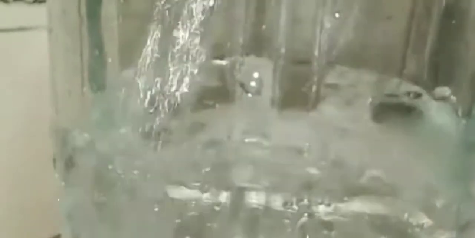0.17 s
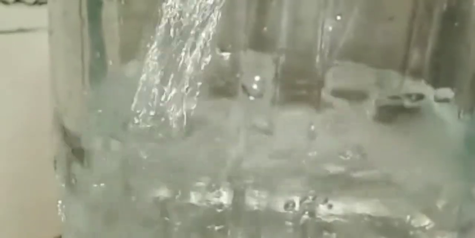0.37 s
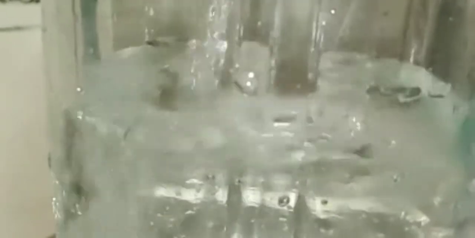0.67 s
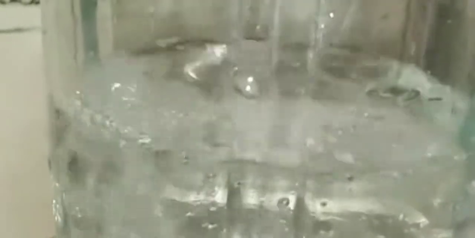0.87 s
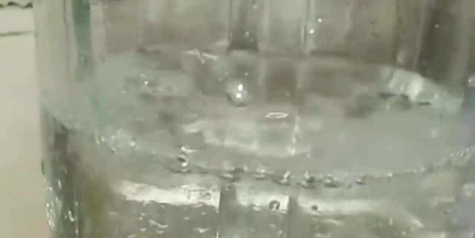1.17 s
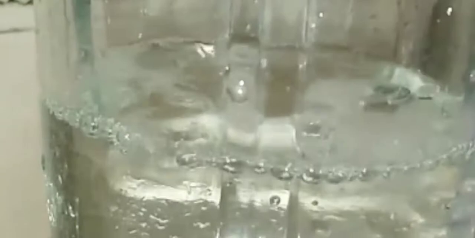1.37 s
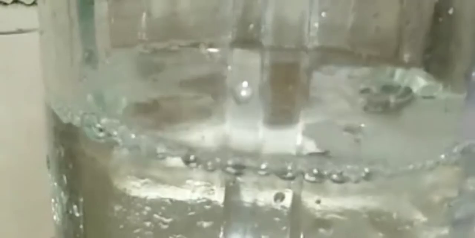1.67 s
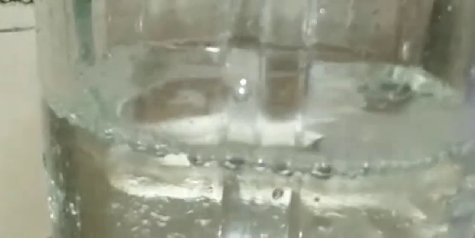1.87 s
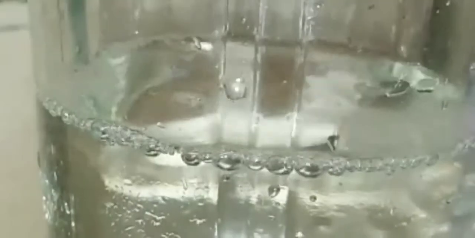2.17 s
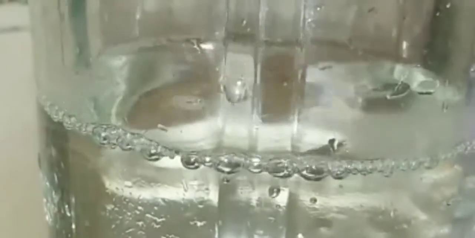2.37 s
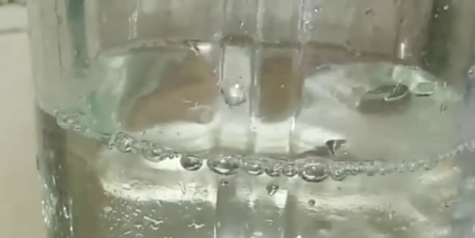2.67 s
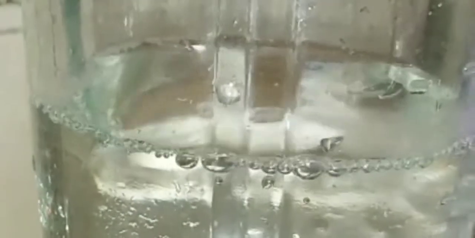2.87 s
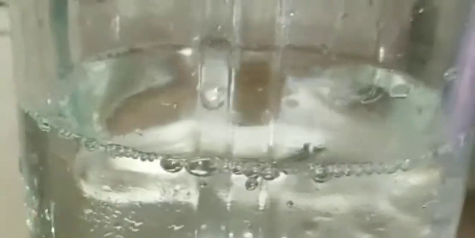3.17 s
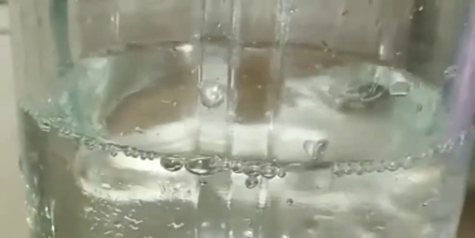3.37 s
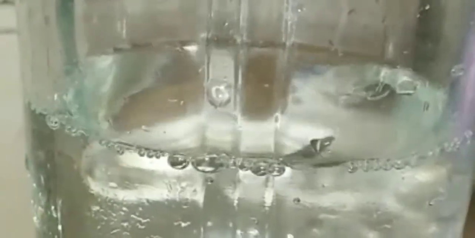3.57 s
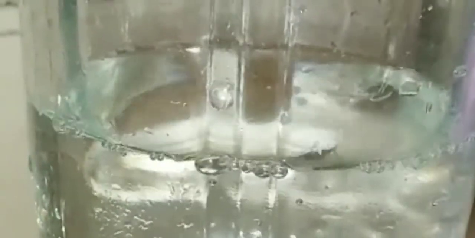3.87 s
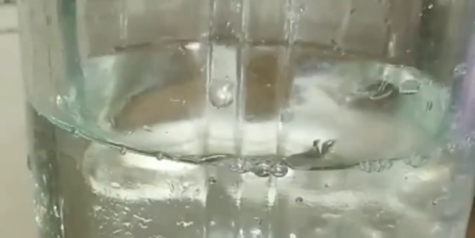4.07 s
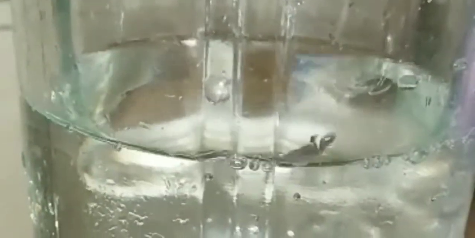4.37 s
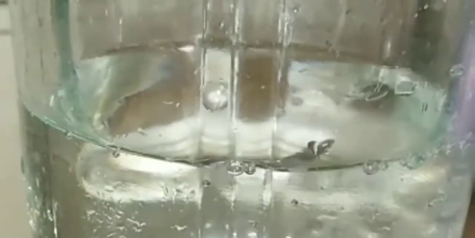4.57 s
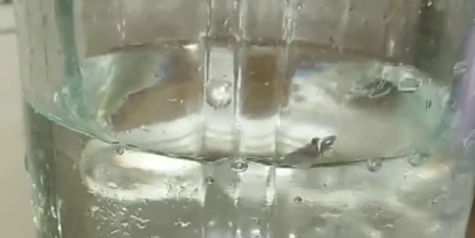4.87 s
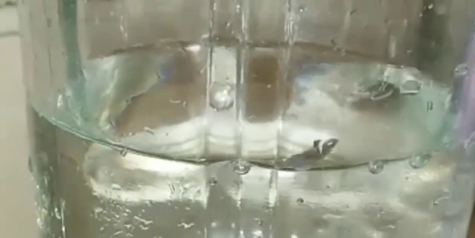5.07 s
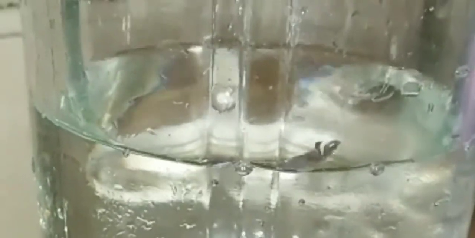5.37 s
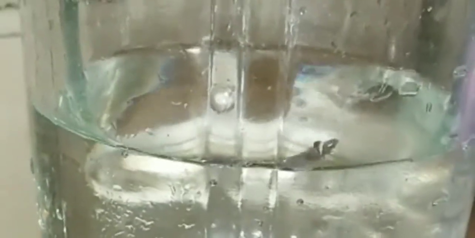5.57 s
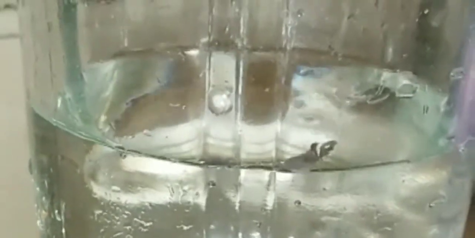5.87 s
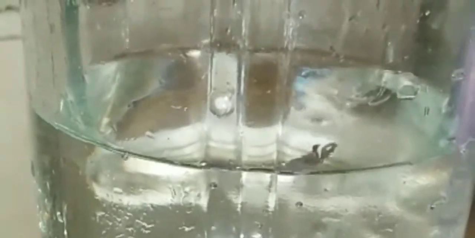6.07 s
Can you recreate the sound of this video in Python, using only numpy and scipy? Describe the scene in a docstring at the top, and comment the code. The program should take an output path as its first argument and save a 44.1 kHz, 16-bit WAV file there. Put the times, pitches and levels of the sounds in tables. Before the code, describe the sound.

Water pours briefly into a glass blender jar and sloshes, then a jug bumps, glass clinks sharply, and the jug lands with a knock.

```python
"""Water pours into a glass blender jar in a small kitchen; the stream thins and stops after a second.
Its sound is that of trapped bubbles ringing, coloured by the air in the jar. The water sloshes and drips.
Impacts then excite the modes of solid bodies: the jug bumps the counter, glass clinks twice, and the jug
rattles and is later set down with a knock. Faint tones and soft sliding come and go in between.
A steady machine drone and the hiss of a nearby phone's microphone lie under it all."""
import sys
import numpy as np
from scipy import signal
from scipy.fft import rfft, irfft
from scipy.io import wavfile
from scipy.ndimage import uniform_filter1d, minimum_filter1d

SR = 44100
rng = np.random.default_rng(int(sys.argv[2]) if len(sys.argv) > 2 else 0)


def transcribe(u):
    """Save the signal u as a 16-bit wav file named by the first command-line argument.

    u: samples, shape (n,) or (channels, n), limited to [-1, 1]; the rate is SR.
    q: integer samples, one column per channel.
    """
    v = np.clip(np.atleast_2d(u).T, -1, 1)
    q = np.round(v * 32767).astype(np.int16)
    wavfile.write(sys.argv[1], SR, q)


N = 274919
T = np.arange(N) / SR
HIT_T = T[:SR * 3 // 5]


def amp(db):
    """Decibels to amplitude ratio."""
    return 10 ** (np.asarray(db) / 20)


def unit(x):
    """Scale to rms 1."""
    return x / np.sqrt(np.mean(x ** 2))


def steady(x, until):
    """Scale a sound that lasts until a given time to rms 1 while it sounds."""
    return unit(x) * np.sqrt(until / T[-1])


def peak(x):
    """Scale to peak 1."""
    return x / np.abs(x).max()


def fade(t60):
    """Exponential damping: a fall of 60 dB in t60 seconds."""
    return np.exp(-np.log(1000) * HIT_T / t60)


def add(out, s, x):
    """Superposition: mix x into out from second s on."""
    i = max(int(s * SR), 0)
    out[i:i + len(x)] += x[:max(N - i, 0)]


def walk(rate_hz):
    """Smoothed random fluctuation with a spread near 1."""
    k = int(SR / rate_hz)
    steps = np.repeat(rng.standard_normal(N // k + 1), k)
    return np.sqrt(2) * uniform_filter1d(uniform_filter1d(steps, k), k)[:N]


def colour(x, points):
    """Minimum-phase filter through (Hz, dB) points, built by folding the cepstrum."""
    hz, db = np.transpose(points)
    size = 4096
    grid = np.maximum(np.fft.rfftfreq(size, 1 / SR), 1)
    cepstrum = irfft(np.log(amp(np.interp(np.log(grid), np.log(hz), db))))
    cepstrum[1:size // 2] *= 2
    cepstrum[size // 2 + 1:] = 0
    return signal.fftconvolve(x, irfft(np.exp(rfft(cepstrum))))[:len(x)]


def resonate(x, peaks):
    """Parallel resonators (Hz, bandwidth in Hz, dB), each applied twice for steep skirts."""
    out = 0
    for hz, width, db in peaks:
        b, a = signal.iirpeak(hz, hz / (width * np.pi / 2), fs=SR)
        out = out + amp(db) * signal.lfilter(b, a, signal.lfilter(b, a, x))
    return out


def ring(modes, scatter_db=0):
    """Free vibration is a sum of damped modes; chance stands for the contact point that weights them."""
    chance = rng.standard_normal((len(modes), 2))
    return peak(sum(np.sign(side) * amp(db + scatter_db * share)
                    * np.sin(2 * np.pi * hz * HIT_T) * fade(t60)
                    for (hz, db, t60), (side, share) in zip(modes, chance)))


def crack(spectrum, t60, chatter_db):
    """Impact excitation: an impulse and fast-dying chatter, filtered to a given spectrum."""
    push = amp(chatter_db) * rng.standard_normal(len(HIT_T)) * fade(t60)
    push[0] += 1
    return peak(colour(push, spectrum))


def bubble(hz, cycles, glide, rise_cycles=1.24):
    """A bubble is a damped oscillator: it swells at pinch-off and rises in pitch near the surface."""
    life = cycles / hz * SR
    age = np.arange(int(life) + 2) / life
    pinch = 1 - np.exp(-(age * cycles / (rise_cycles * np.sqrt(hz / 3000))) ** 2)
    return pinch * np.sin(2 * np.pi * cycles * age * (1 + glide * age / 2)) * np.exp(-np.log(1000) * age)


def swarm(count, low_hz, high_hz, cycles, glide, spread_db, until):
    """Bubbles of random size, born at random moments, add incoherently."""
    out = np.zeros(N)
    for when, size, strength, life in rng.random((count, 4)):
        hz = low_hz * (high_hz / low_hz) ** size
        gain = amp(-spread_db * np.log(max(1 - strength, .04))) * hz / high_hz
        add(out, when * until, gain * bubble(hz, cycles * (.5 + life), glide))
    return out


# The stream narrows and breaks up, trapping more large bubbles and throwing less spray.
# Each row: time in seconds, relative levels of large bubbles and of spray in dB.
POUR = [(0, -59, -45.5), (.2, -62, -46.5), (.32, -56, -49.5), (.46, -52, -49), (.56, -48, -52),
        (.82, -47.5, -51), (.97, -47.5, -58), (1.039, -60, -80)]
# Air carried under by the stream. Each row: time in seconds, level in dB.
GURGLE = [(0, -55), (.38, -53.5), (.55, -50), (.78, -50.5), (1.04, -69)]
# Modes of the air column above the water. Each row: frequency in Hz, bandwidth in Hz, gain in dB.
AIR_COLUMN = [(324, 56, -4), (546, 63, -1.5), (1420.3, 70, -13), (1700, 97, -4.5), (1947, 79, -7),
              (2565, 76, -10), (3090, 56, -20)]
# Spectra of bubbles, spray and splashes as heard through the microphone, which rings near 8.6 kHz.
# Each row: frequency in Hz, gain in dB.
BUBBLE_COLOUR = [(150, -21), (450, -11), (700, -7), (1000, 1), (1450, -1.5), (1800, -14), (2100, -4),
                 (2800, -19), (5000, -40)]
SPRAY_COLOUR = [(1500, -14), (2800, -14.5), (4500, -9.5), (7000, -10), (8500, 2.5), (9400, -4),
                (11000, -16.5), (15500, -15)]
SPLASH_COLOUR = [(200, -14), (600, -16.5), (950, 1), (1500, 1), (2300, -5.5), (3200, -11.5), (5000, -12),
                 (7000, -22.5), (8600, -4), (11000, -24), (15500, -32)]
def stream(bubble_db=-5, spray_db=-4, splash_db=-5):
    """Air entrainment: a plunging jet traps ringing bubbles, which also drive the air column."""
    s, large_db, fine_db = np.transpose(POUR)
    end = s[-1]
    large_gain, fine_gain = amp(np.interp(T, s, large_db)), amp(np.interp(T, s, fine_db))
    large = swarm(count=600, low_hz=402, high_hz=3330, cycles=31, glide=.049, spread_db=6, until=end)
    fine = swarm(count=850, low_hz=2397, high_hz=12000, cycles=160, glide=.097, spread_db=3.5, until=end)
    splash = swarm(count=2800, low_hz=498, high_hz=14600, cycles=19, glide=.12, spread_db=2.5, until=end)
    churn = swarm(count=850, low_hz=203, high_hz=4070, cycles=6.4, glide=.1, spread_db=4, until=end)
    out = amp(bubble_db) * large_gain * steady(colour(large, BUBBLE_COLOUR), end)
    out += amp(spray_db) * fine_gain * steady(colour(fine, SPRAY_COLOUR), end)
    out += amp(splash_db) * np.sqrt(large_gain * fine_gain) * steady(colour(splash, SPLASH_COLOUR), end)
    churn_db = np.interp(T, *np.transpose(GURGLE))
    return out + amp(churn_db) * steady(resonate(churn, AIR_COLUMN), end)


# Cross modes of the air in the jar. Each row: frequency in Hz, bandwidth in Hz, gain in dB.
JAR_MODES = [(1060, 63, -11), (1457, 210, -8.5), (1988, 74, -1), (2690, 140, -5), (3153, 88, 3),
             (3700, 100, -1), (4370, 130, 0), (5540, 81, 2.5), (6640, 83, 0)]
def jar(x):
    """Standing waves between the glass walls reinforce every splash."""
    return x + resonate(x, JAR_MODES)


def kitchen(x, wet_db, t60_low=0.55, t60_high=0.43, gap_s=0.0032):
    """Reverberation: hard walls close by return a dense tail that dies sooner in the treble."""
    noise = rng.standard_normal(len(HIT_T))
    low = signal.sosfilt(signal.butter(2, 2000, fs=SR, output="sos"), noise)
    high = signal.sosfilt(signal.butter(2, 2000, "high", fs=SR, output="sos"), noise)
    tail = (low * fade(t60_low) - high * fade(t60_high)) * np.clip(HIT_T / gap_s - 1, 0, 1)
    return x + amp(wet_db) * signal.fftconvolve(x, tail / np.linalg.norm(tail))[:N]


# Spectra of microphone hiss and room rumble. Each row: frequency in Hz, gain in dB.
HISS = [(2940, -42), (5000, -17.5), (5800, -10.5), (6940, -12), (8090, 0), (9000, 2), (11200, -13.5),
        (13200, -13.5), (14900, -18.5), (15800, -21)]
RUMBLE = [(30, -47), (47, 9.5), (65, -3.5), (90, 0), (150, 1), (240, -8), (400, -7.5), (700, -16),
          (1100, -14), (1500, -14), (1900, -20.5), (3200, -22), (5000, -22.5), (6000, -42)]
# Resonances of the machine. Each row: frequency in Hz, bandwidth in Hz, gain in dB.
DRONE = [(318.7, 11.7, -0.5), (345.4, 36.4, 3.5), (1310, 26, -7), (1507, 16, -10), (2136, 50, -16)]
def background(hiss_db=-54, rumble_db=-57.5, drone_db=-57.5, waver_db=2.36):
    """Noise-driven resonances make a machine's wavering drone, over broadband rumble and hiss."""
    hiss, rumble, drone = rng.standard_normal((3, N))
    return (amp(hiss_db) * unit(colour(hiss, HISS))
            + amp(rumble_db) * unit(colour(rumble, RUMBLE))
            + amp(drone_db + waver_db * walk(5.4)) * unit(resonate(drone, DRONE)))


JET_END_S = .86
# The clearest drops. Each row: start in seconds, relative bubble level in dB, bubble pitch in Hz,
# relative splatter level in dB.
DROPS = [(.077, -22, 8200, -41), (.116, -27.5, 8560, -46), (0.15, -33, 2010, -59), (.251, -32, 570, -42.5),
         (.356, -33.5, 1940, -60), (0.405, -35.5, 3050, -43.5), (.456, -34, 2590, -63),
         (.539, -31, 920, -48), (0.565, -21, 8360, -47), (.635, -35, 3260, -64), (.672, -32.5, 5700, -52),
         (.718, -33, 4480, -43.5), (.749, -31, 770, -41.5), (.811, -21.5, 9000, -43.5),
         (.835, -31.5, 185, -47), (.85, -32.5, 330, -60), (.843, -21.5, 8530, -42), (.872, -33, 1310, -48),
         (.901, -43, 1300, -40.5), (.984, -30.5, 1390, -56), (1.175, -40, 1400, -49),
         (1.205, -33, 1040, -45), (1.453, -35, 1580, -48.5), (1.644, -32, 1210, -63),
         (1.768, -35, 910, -65), (2.0155, -35, 1900, -54), (2.545, -39, 1340, -59), (2.942, -38, 1000, -55)]
def drops(cycles=26, glide=0.11, bubble_db=-3, satellite_db=-10, scatter_s=0.0097):
    """Drop impact: each one splatters and sets a main bubble and five satellites oscillating."""
    out = np.zeros(N)
    for s, db, hz, splatter_db in DROPS:
        life = cycles * np.sqrt(hz / 1500)  # small bubbles last more cycles
        add(out, s, amp(db + bubble_db) * bubble(hz, life, glide))
        for delay, size in rng.random((5, 2)):
            satellite = bubble(hz * 2 ** (0.74 * (size - .5)), life, glide)
            add(out, s + scatter_s * delay, amp(db + satellite_db) * satellite)
        if s < JET_END_S:  # the fast jet spatters brightly
            add(out, s, amp(splatter_db + 7) * crack(SPRAY_COLOUR, t60=0.12, chatter_db=2))
        else:  # falling water slaps more dully
            add(out, s, amp(splatter_db + 15) * crack(SPLASH_COLOUR, t60=0.13, chatter_db=-19))
    return out


# Waves slapping the wall. Each row: crest time in seconds, relative levels of bubbles and spray in dB.
SLOSHES = [(.9, -49, -45), (1.09, -48.5, -57), (1.23, -44, -52), (1.385, -51, -56), (1.465, -57.5, -66),
           (1.745, -49.5, -59), (1.955, -49.5, -57), (2.125, -53, -54)]
def sloshing(lap_db=-4, spray_db=-3, rise_s=0.025, t60=0.29, ripple_db=-62, fall_db_per_s=2.5):
    """Gravity waves break into short-lived bubbles and spray; between them ripples lap ever fainter."""
    end = 2.6  # seconds; the water is then still
    laps = swarm(count=1600, low_hz=400, high_hz=3500, cycles=15, glide=.08, spread_db=4.5, until=end)
    spray = swarm(count=4000, low_hz=1200, high_hz=13000, cycles=16, glide=.1, spread_db=3.5, until=end)
    ripples = swarm(count=90, low_hz=800, high_hz=2800, cycles=7, glide=.1, spread_db=3.5, until=end)
    laps, ripples = (steady(colour(x, BUBBLE_COLOUR), end) for x in (laps, ripples))
    spray = steady(colour(spray, SPLASH_COLOUR), end)
    out = ripples * amp(ripple_db - fall_db_per_s * (T - JET_END_S)) * (T > JET_END_S)
    for crest, bubbles_db, fine_db in SLOSHES:
        swell = np.exp(-np.maximum((crest - T) / rise_s, 0) ** 2)
        decay = np.exp(-np.log(1000) * np.maximum(T - crest, 0) / t60)
        out += swell * decay * (amp(bubbles_db + lap_db) * laps + amp(fine_db + spray_db) * spray)
    return out


# Modes of the jug's wall. Each row: frequency in Hz, relative level in dB, t60 in seconds.
JUG_MODES = [(1196, 1.5, 0.028), (1477, 2, 0.048), (1610, -11, 0.058), (2010, -9, 0.042), (2530, -4, 0.05),
             (2914, -2.5, 0.05), (3740, -5.5, 0.012), (4080, 2, 0.038), (5050, -1, 0.038), (5880, 0, 0.034),
             (7400, 5, 0.019), (8800, 11, 0.021)]
# Spectrum of a contact with the jug. Each row: frequency in Hz, gain in dB.
TAP_COLOUR = [(70, -32), (200, -1.5), (600, -1.5), (900, 1), (1500, -0.5), (2000, -4), (2800, -4),
              (3800, -7.5), (5200, -1), (7000, -3), (8800, 1.5), (11000, -20), (15500, -47)]
def tap(bright_db, ring_db=1, crack_db=-5):
    """An impact excites the modes of the jug's wall; harder contact gives more treble."""
    wall = amp(ring_db) * ring(JUG_MODES, scatter_db=2.5)
    contact = amp(crack_db) * crack(TAP_COLOUR, t60=0.16, chatter_db=-12.5)
    return peak(colour(wall + contact, [(1500, 0), (5000, bright_db)]))


# Bumps of the jug. Each row: start in seconds, peak in dB, treble gain in dB, counter thump in dB.
TAPS = [(1.699, -26.5, -0.5, -62), (1.709, -25.5, -5, -42.5), (1.845, -25, -0.5, -30.5),
        (1.914, -36, -1, -63), (2.692, -16, 3, -65), (2.703, -17, 3, -62), (5.502, -35.5, 33, -84)]
# Modes of the counter under the jug. Each row: frequency in Hz, relative level in dB, t60 in seconds.
COUNTER_MODES = [(91.6, -2, 0.26), (141.7, -2, 0.24), (185, -4.5, 0.17), (265, -5.5, 0.078)]
def bumps(contacts):
    """Mechanical coupling: each contact rings the jug and, just after, thumps the counter."""
    out = np.zeros(N)
    for s, db, bright_db, thump_db in contacts:
        add(out, s, amp(db) * tap(bright_db))
        add(out, s + 0.0034, amp(thump_db) * ring(COUNTER_MODES))
    return out


# Faint tones. Each row: start and end in seconds, frequency and bandwidth in Hz, top level in dB.
TONES = [(2.394, 2.5, 4300, 350, -63.5), (3.08, 3.24, 4130, 91, -71), (3.228, 3.285, 4180, 80, -64.5),
         (3.714, 4.24, 586, 9.5, -68), (3.893, 4.248, 1490, 14, -67.5)]
def tones():
    """Narrow-band noise is heard as thin, wavering tones; each swells and fades."""
    noise = rng.standard_normal(N)
    out = np.zeros(N)
    for start, end, hz, width, db in TONES:
        swell = np.interp(T, [start, (start + end) / 2, end], [0, 1, 0])
        out += amp(db) * swell * unit(resonate(noise, [(hz, width, 0)]))
    return out


# Glass striking glass. Each row: start in seconds, relative level in dB, t60 of the chatter in seconds.
CLINKS = [(2.7179, 8.5, 0.018), (2.7478, 5, 0.014)]
# The shrill modes that the contact drives hardest, and the lasting modes of the glass.
# Each row: frequency in Hz, relative level in dB, t60 in seconds before any added damping.
CONTACT_MODES = [(8410, 4, 0.05), (8800, 4, 0.04), (9400, -2, 0.053)]
GLASS_MODES = [(1561, -23, .2), (2433, -26, .5), (2846, -15, .2), (4237, -18, .2), (5030, -14, .25),
               (5394, -20, .4), (5841, -19, .45), (6315, -16, .33), (6540, -12, .35), (8070, -9, .4),
               (8175, -9, .35), (8376, -1, .35), (8450, 0, .33), (8614, -1, .27), (8723, -2, .33),
               (8947, -7, .27), (9275, -3, .27), (9344, -5, .25), (9975, -14, .3), (10060, -19, .35),
               (11380, -21, .25), (12400, -19, .24), (12700, -22, .22)]
# Spectrum of the crack. Each row: frequency in Hz, gain in dB.
CLINK_COLOUR = [(70, -60), (200, -39), (1000, -38), (3800, -35.5), (5200, -17), (7300, -19.5), (8000, -8),
                (8500, 2), (9200, -29), (9800, -13), (11500, -23), (15500, -43)]
def clinks(ring_db=-25.5, burst_db=1, crack_db=-5, wall_db=-27):
    """Elastic collision: glass strikes and rebounds, with a crack, a damped burst and a thin ring."""
    out = np.zeros(N)
    for s, db, t60 in CLINKS:
        burst = amp(burst_db) * ring(CONTACT_MODES) * fade(3 * t60)
        body = amp(ring_db) * ring(GLASS_MODES) + amp(wall_db) * tap(bright_db=0.5)
        contact = amp(crack_db) * crack(CLINK_COLOUR, t60, chatter_db=1)
        add(out, s, amp(db) * (burst + contact + body))
    return out


def rattle(start_s=2.858, gap_s=0.015, count=7, first_db=-32.5, loss_db=2, bright_db=-7.5, thump_db=-21):
    """Dissipation: the jug settles in uneven contacts, each weaker. Returns rows like those of TAPS."""
    k = np.arange(count)
    times = start_s + gap_s * (k + .2 * rng.standard_normal(count) * (k > 0))
    return [(s, db, bright_db, db + thump_db) for s, db in zip(times, first_db - loss_db * k)]


# Something slides softly. Each row: start, crest and end in seconds, level in dB.
SLIDES = [(3.01, 3.187, 3.22, -47), (5.666, 5.914, 5.97, -47)]
# Spectrum of the soft sliding hiss, with the microphone's 8.6 kHz resonance.
# Each row: frequency in Hz, gain in dB.
SLIDE_COLOUR = [(2500, -26), (5000, -22.5), (7000, -20), (8600, 1), (10500, -21), (15500, -25)]
def slides(grain_db=2):
    """Sliding friction makes a faint, uneven noise that swells and stops."""
    swell = sum(amp(db) * np.interp(T, [start, top, end], [0, 1, 0]) for start, top, end, db in SLIDES)
    hiss = colour(rng.standard_normal(N), SLIDE_COLOUR)
    return swell * unit(hiss * amp(grain_db * walk(70)))


# Modes of the worktop. Each row: frequency in Hz, relative level in dB, t60 in seconds.
WORKTOP_MODES = [(200, -17, 0.18), (310, -11, 0.2), (387.5, 4, 0.095), (467, -1, 0.085), (511, -14.5, 0.47),
                 (546, -7, 0.4), (576, -6.5, 0.39), (645, -10, 0.4), (728, 2.5, 0.075), (840, -7, 0.051),
                 (946, -21, 0.18), (1130, -20, 0.15), (1244, -3, 0.09), (1307, -7, 0.06), (1640, -29, 0.1),
                 (1884, -11, 0.069), (2440, -27, 0.096), (3380, -17.5, .1)]
# Spectrum of the blow. Each row: frequency in Hz, gain in dB.
KNOCK_COLOUR = [(90, -40), (190, -7.5), (400, -4.5), (750, 4), (1350, -6.5), (1900, -23.5), (3500, -22),
                (6500, -29.5), (8600, -29), (11000, -46), (15500, -58)]
def knock(start_s=5.9458, level_db=-8, ring_db=-5):
    """Plate vibration: the jug lands with one dull push, then the worktop rings freely."""
    board = amp(ring_db) * ring(WORKTOP_MODES)
    blow = crack(KNOCK_COLOUR, t60=0.14, chatter_db=-29.5)
    out = np.zeros(N)
    add(out, start_s, amp(level_db) * (board - blow))
    return out


def scene():
    """Superposition of all sources in the kitchen, alike in both channels."""
    water = kitchen(jar(stream() + sloshing() + drops()), wet_db=-7)
    handling = kitchen(bumps(list(TAPS) + rattle()), wet_db=-10.5)
    handling += kitchen(clinks(), wet_db=-16)
    handling += kitchen(knock(), wet_db=-13)
    mono = water + handling + slides() + tones() + background()
    return np.array([mono, mono])


# The sound cuts out briefly. Each row: time in seconds, gain as an amplitude ratio.
DIP = [(.99, 1), (1.01, .15), (1.021, .004), (1.037, .004), (1.048, 1)]
def record(dry, ceiling=.73, bottom_hz=42, top_hz=15850):
    """Band and peak limiting: the phone cuts both extremes and holds the clinks; the level dips once."""
    thin = signal.sosfilt(signal.butter(6, bottom_hz, "high", fs=SR, output="sos"), dry)
    gain = np.minimum(1, ceiling / (np.abs(thin).max(axis=0) + 1e-9))
    gain = uniform_filter1d(minimum_filter1d(gain, size=45), size=45)  # hold and smooth over 1 ms
    held = thin * gain * np.interp(T, *np.transpose(DIP))
    return signal.sosfilt(signal.ellip(10, .2, 70, top_hz, fs=SR, output="sos"), held)


dry = scene()
out = record(dry)
transcribe(out)
```